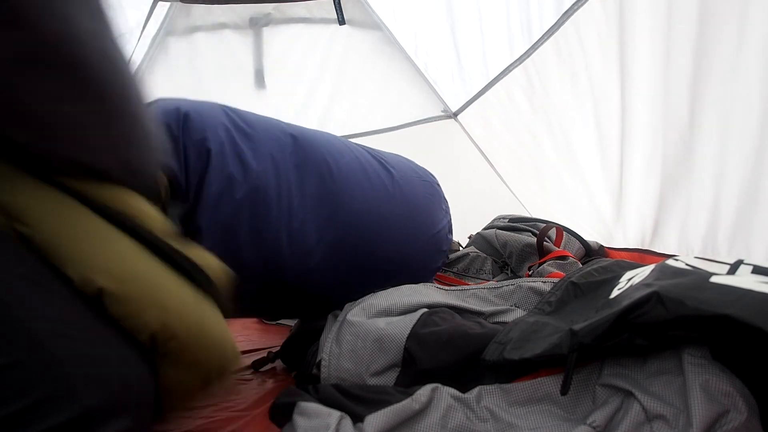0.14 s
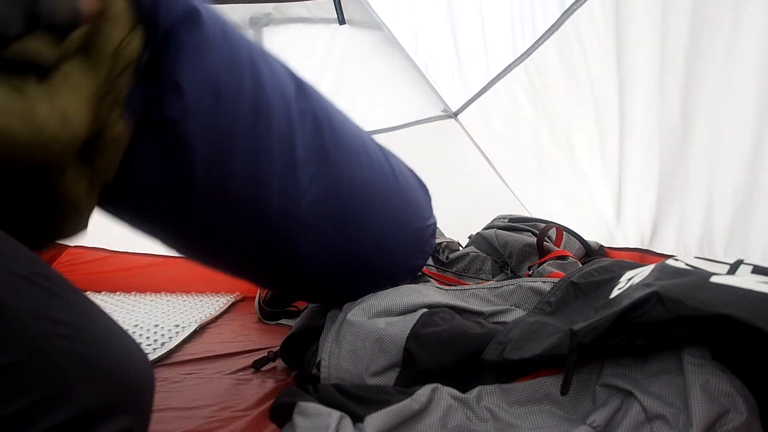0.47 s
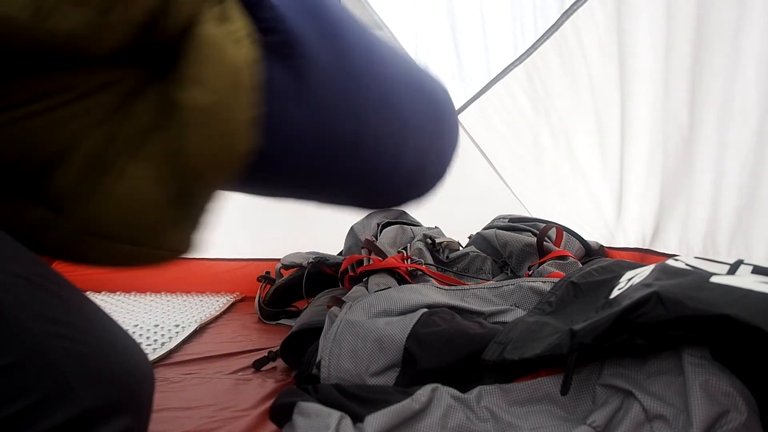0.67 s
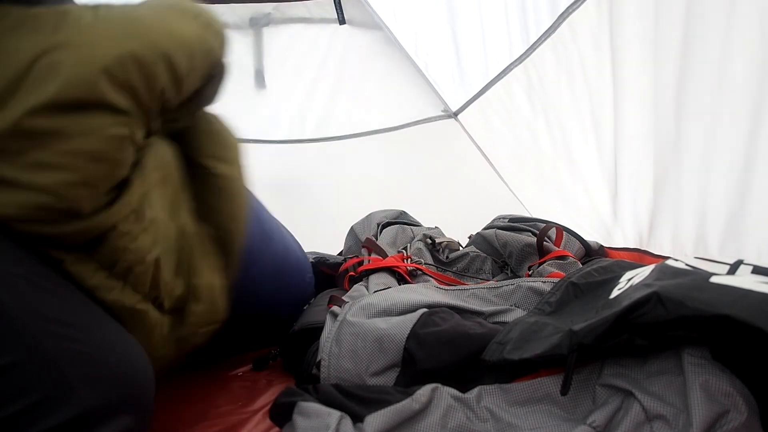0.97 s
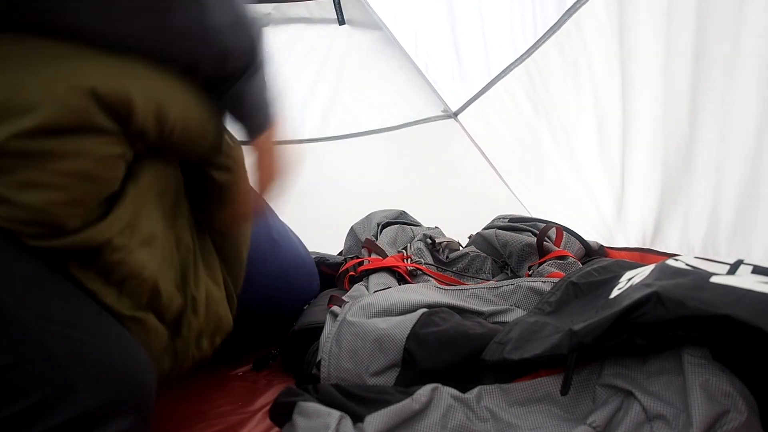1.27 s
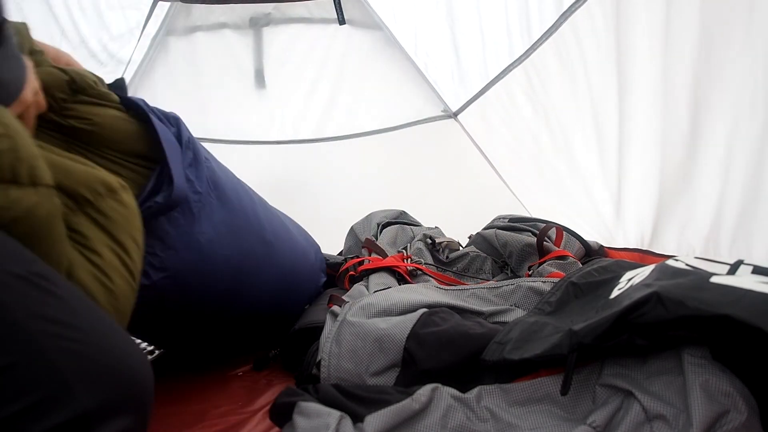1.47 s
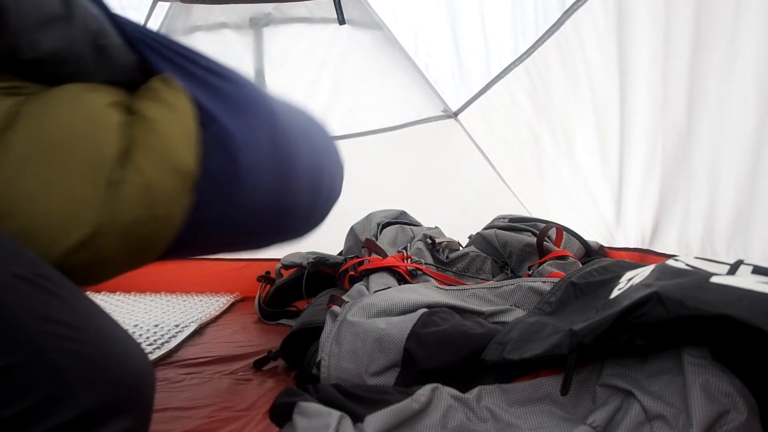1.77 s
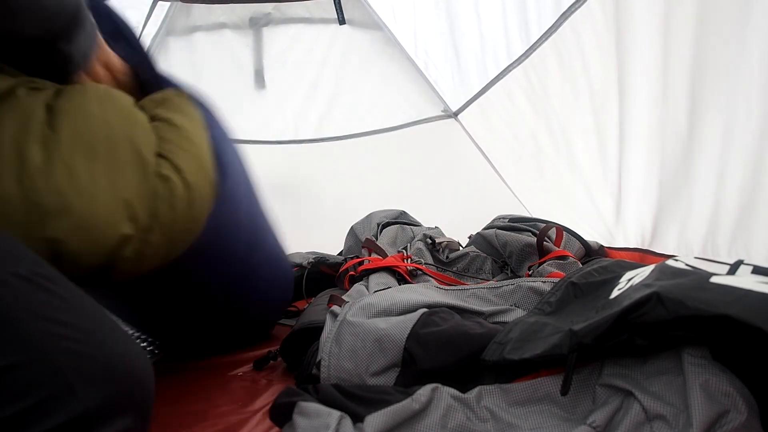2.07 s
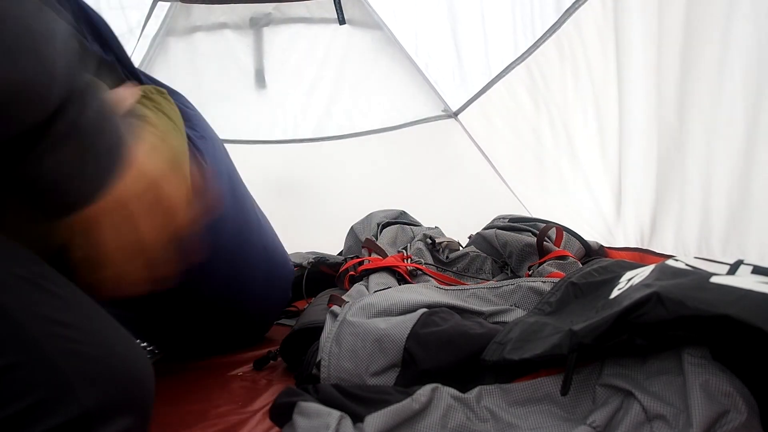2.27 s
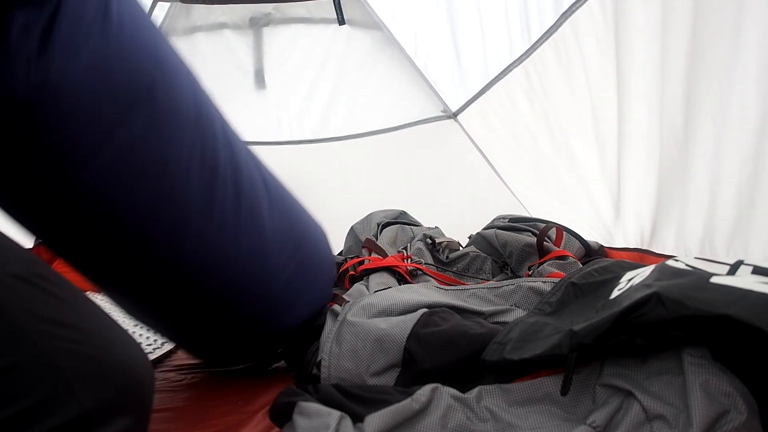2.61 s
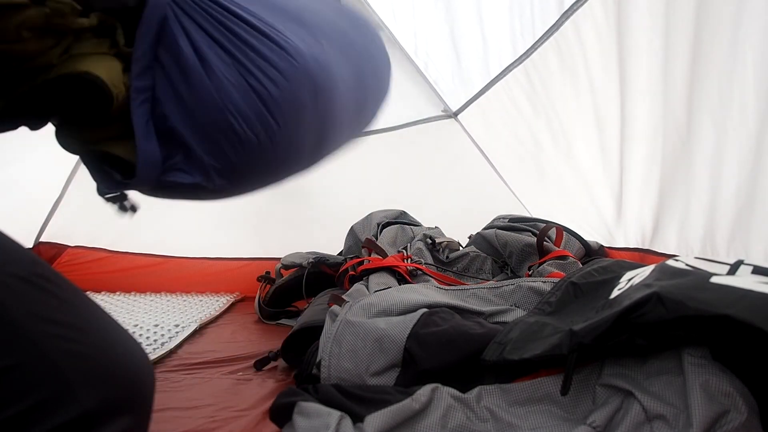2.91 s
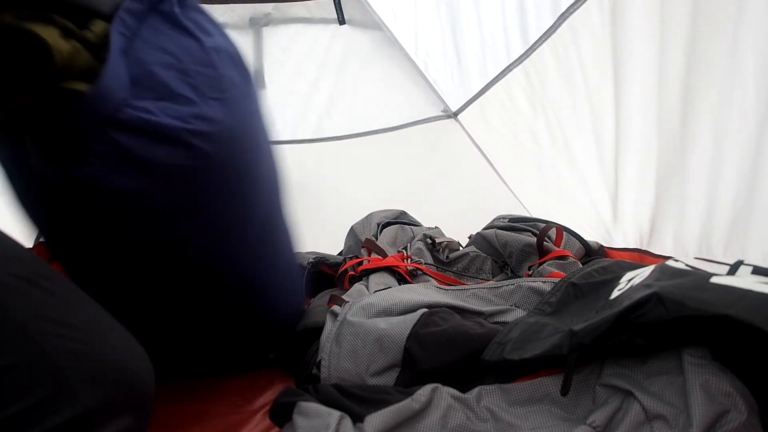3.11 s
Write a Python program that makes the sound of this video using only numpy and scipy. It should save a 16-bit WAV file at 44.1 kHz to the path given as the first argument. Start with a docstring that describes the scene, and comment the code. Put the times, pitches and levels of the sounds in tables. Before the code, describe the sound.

Nylon sleeping bag stuffed into its sack in three hissing shoves, with crinkles, snaps and soft pats.

```python
"""A down sleeping bag is pushed into its nylon stuff sack, close up in a small tent, in mono over faint air.
The first shove is hissing, rustling grains of cloth over muffled padding; gliding noise bands zip along the weave
and decaying sines snap as creases. A sleeve flicks, then the cloth is gathered, with soft sagging bumps and pats
made of slap and thump noise. A second shove, a pause, a third shove and a settle follow,
still with zips, snaps, bumps and pats; the last pats land just before the settle."""
import sys
import numpy as np
from scipy import signal
from scipy.fft import rfft, irfft, next_fast_len
from scipy.io import wavfile

SR = 44100
rng = np.random.default_rng(int(sys.argv[2]) if len(sys.argv) > 2 else 0)


def file_out(sig):
    """Save sig as 16-bit WAV at sys.argv[1]."""
    # one column per channel
    cols = np.atleast_2d(sig).T
    # limit, then scale
    lim = np.clip(cols, -1, 1)
    pcm = np.round(lim * 32767).astype(np.int16)
    wavfile.write(sys.argv[1], SR, pcm)


N = 143325
T = np.arange(N) / SR


def from_db(db):
    """Decibels to gain."""
    return 10 ** (np.asarray(db) / 20)


def rms_one(x):
    """Scale to unit power."""
    return x / np.sqrt(np.mean(x ** 2) + 1e-20)


def drift(rate_hz):
    """Random wander of unit power: noise through two equal one-pole lowpasses at the given rate."""
    pole = np.exp(-2 * np.pi * rate_hz / SR)
    noise = rng.standard_normal(N + SR)
    wander = signal.lfilter([1], [1, -2 * pole, pole * pole], noise)
    return rms_one(wander[SR:])  # drop the first second, while the filter settles


def coloured(x, spectrum):
    """Minimum-phase filter through the given (f/Hz, level/dB) points; unit power."""
    size = 2 * next_fast_len(N)
    hz, db = np.transpose(spectrum)
    bins = np.maximum(np.arange(size // 2 + 1) * SR / size, 1)
    gain = from_db(np.interp(np.log(bins), np.log(hz), db))
    # folding the cepstrum makes the filter causal
    cepstrum = irfft(np.log(gain))
    cepstrum[1:size // 2] *= 2
    cepstrum[size // 2 + 1:] = 0
    response = np.exp(rfft(cepstrum))
    return rms_one(irfft(rfft(x, size) * response)[:N])


GRAIN_TOP = 3.5  # cap on grain size, in spreads


def grains(per_s, spread_db):
    """Tiny random slips of uneven size and either sign."""
    sizes = from_db(spread_db * np.minimum(rng.exponential(1, N), GRAIN_TOP))
    signs = rng.choice([-1, 1], N)
    return sizes * signs * (rng.random(N) < per_s / SR)


FLICKER_PER_S = 26  # corner rate of the wander, Hz


def flickering(x, depth_db):
    """Each band swells and fades as folds open and close, partly in step with the others."""
    bins = np.maximum(np.arange(N // 2 + 1) * SR / N, 1)
    whole = rfft(x)
    centres = np.log(np.geomspace(150, 13000, 12))
    together, out = drift(FLICKER_PER_S), 0
    for share in np.eye(len(centres)):
        band = irfft(whole * np.interp(np.log(bins), centres, share), N)
        swell = .5 * together + drift(FLICKER_PER_S)
        out = out + band * from_db(depth_db * swell)
    return rms_one(out)


def burst(s, rise, fall, hold=0):
    """Exponential rise, a hold at the top, then exponential fall; all in seconds."""
    before = (s - T) / rise
    after = (T - s - hold) / fall
    return np.exp(-np.maximum(np.maximum(before, after), 0))


# outdoor air, relative colour: (f/Hz, level/dB)
AIR = [(20, -20), (60, -3.5), (200, -4), (400, -8), (1500, -7), (16000, -25)]
AIR_DB = -60.5


def outdoor_air():
    """Faint steady outdoor air: coloured noise."""
    return from_db(AIR_DB) * coloured(rng.standard_normal(N), AIR)


# sliding cloth by stretch: (t/s, hiss level/dB, rustle level/dB), before the layer trims below
FIRST_SHOVE = [(0, -42.5, -48), (0.04, -44.5, -42.5), (0.13, -38.5, -38), (0.195, -32, -39),
               (0.29, -37, -43.5), (0.36, -36.5, -39.5), (0.43, -32, -39), (0.508, -32, -34.5),
               (0.52, -28, -37), (0.595, -28, -33.5), (0.668, -29, -37.5), (0.735, -48, -46.5)]
GATHER = [(0.79, -40.5, -44.5), (0.82, -42, -38), (0.85, -35.5, -41.5), (0.915, -39, -39),
          (0.948, -37, -40.5), (1.0, -42, -48), (1.055, -45.5, -46), (1.12, -40.5, -50.5),
          (1.245, -44.5, -44.5)]
SECOND_SHOVE = [(1.29, -38.5, -40.5), (1.355, -35, -38), (1.455, -41, -43.5), (1.58, -36.5, -39),
                (1.66, -26.5, -35), (1.72, -28.5, -37), (1.8, -43, -44), (1.86, -46.5, -48),
                (1.935, -38, -44), (1.972, -33, -46), (1.987, -39, -47), (2.02, -40.5, -44)]
PAUSE = [(2.07, -41.5, -42.5), (2.125, -47.5, -50.5), (2.247, -50, -45.5)]
THIRD_SHOVE = [(2.27, -41.5, -41.5), (2.305, -33.5, -45.5), (2.335, -37, -42.5), (2.42, -35.5, -38.5),
               (2.5, -32.5, -39), (2.58, -35.5, -38), (2.65, -32.5, -36.5), (2.7, -27.5, -34),
               (2.81, -29.5, -34.5), (2.85, -33, -36.5), (2.885, -41, -45.5), (2.93, -47, -46.5),
               (3.0, -39, -47), (3.025, -39.5, -42)]
SETTLE = [(3.125, -35.5, -44), (3.175, -45, -44.5), (3.205, -45, -41), (3.25, -39.5, -47)]
# relative colour of the fine hiss and the duller folds: (f/Hz, level/dB)
HISS = [(300, -24.5), (1000, -8.5), (2000, -4.5), (3200, -2), (4900, -1), (5700, 0), (6250, -4.5),
        (8000, -4.5), (9500, -8), (11000, -13.5), (13500, -18), (16000, -29.5)]
RUSTLE = [(30, -37), (200, -15), (480, -12.5), (750, -2), (1080, -1.5), (1600, -4), (2300, -8.5),
          (4000, -16), (9000, -31), (16000, -19)]
HISS_TRIM_DB, HISS_GRAINS_PER_S, HISS_SPREAD_DB, HISS_FLICKER_DB = 0.62, 10000, 1.8, 0.82
RUSTLE_TRIM_DB, RUSTLE_GRAINS_PER_S, RUSTLE_SPREAD_DB, RUSTLE_FLICKER_DB = -0.12, 1800, 1.5, 0.7
# a quick flick of the sleeve
FLICK_AT_S, FLICK_RISE_S, FLICK_FALL_S, FLICK_DB = 0.760, 0.0096, 0.029, -32.5
# faster sliding is louder and brighter: the treble gains this many dB per dB of hiss above the medium level
BRIGHTEN_ABOVE_HZ, BRIGHTEN_DB_PER_DB, MEDIUM_HISS_DB = 6500, 0.0538, -36
CRINKLE_TRIM_DB = -3.5


def sliding():
    """Threads catch and slip in a hiss that brightens with speed; larger folds rustle and crinkle below it."""
    stretches = [FIRST_SHOVE, GATHER, SECOND_SHOVE, PAUSE, THIRD_SHOVE, SETTLE]
    s, hiss_db, rustle_db = np.vstack(stretches).T
    slide_level = from_db(HISS_TRIM_DB + np.interp(T, s, hiss_db))
    flick_level = from_db(FLICK_DB) * burst(FLICK_AT_S, FLICK_RISE_S, FLICK_FALL_S)
    hiss_level = np.hypot(slide_level, flick_level)

    hiss = coloured(grains(HISS_GRAINS_PER_S, HISS_SPREAD_DB), HISS)
    hiss = flickering(hiss, HISS_FLICKER_DB)
    treble_filter = signal.butter(1, BRIGHTEN_ABOVE_HZ, "high", fs=SR, output="sos")
    treble = signal.sosfilt(treble_filter, hiss)
    treble_gain = (hiss_level / from_db(MEDIUM_HISS_DB)) ** BRIGHTEN_DB_PER_DB
    hiss = hiss + treble * (treble_gain - 1)

    rustle = coloured(grains(RUSTLE_GRAINS_PER_S, RUSTLE_SPREAD_DB), RUSTLE)
    rustle = flickering(rustle, RUSTLE_FLICKER_DB)
    effort = from_db(np.interp(T, s, rustle_db))
    folds = from_db(RUSTLE_TRIM_DB) * effort * rustle
    return hiss * hiss_level + folds + from_db(CRINKLE_TRIM_DB) * crinkle(effort)


CRINKLE_LOW_HZ, CRINKLE_HIGH_HZ, CRINKLE_Q = 935, 2800, 3
CRINKLES_PER_S, CRINKLE_SPREAD_DB = 300, 2.5  # mean rate over all panels


def crinkle(effort):
    """Panels of different sizes buckle at random and ring briefly: sparse at rest, dense under effort."""
    pitches, out = np.geomspace(CRINKLE_LOW_HZ, CRINKLE_HIGH_HZ, 14), 0
    per_s = CRINKLES_PER_S / len(pitches) * effort / effort.mean()
    for hz in pitches:
        b, a = signal.iirpeak(hz, CRINKLE_Q, fs=SR)
        buckles = grains(per_s, CRINKLE_SPREAD_DB) + 1e-18  # offset keeps the filter off denormals
        out = out + signal.lfilter(b, a, buckles) / hz
    return rms_one(out) * np.sqrt(effort * effort.mean())


# muffled shifting of the padding, in the bass: (t/s, level/dB)
PADDING_LEVEL = [(0, -52), (0.5, -49.5), (0.75, -56), (0.9, -53), (1.1, -62), (1.65, -50.5), (1.85, -63),
                 (2.02, -54.5), (2.18, -61), (2.5, -49), (2.9, -63), (3.25, -53)]
# its relative colour: (f/Hz, level/dB)
PADDING = [(30, -18), (70, -13), (220, 0), (500, -2.5), (1500, -35)]
PADDING_GRAINS_PER_S, PADDING_SPREAD_DB = 600, 4


def padding():
    """The filling shifts in soft, muffled lumps: sparse grains, darkly filtered."""
    level = from_db(np.interp(T, *np.transpose(PADDING_LEVEL)))
    return level * coloured(grains(PADDING_GRAINS_PER_S, PADDING_SPREAD_DB), PADDING)


# zips of the weave, pitch following the sliding speed: (middle t/s, length/s, level/dB, first f/Hz, last f/Hz)
ZIPS = [(0.136, 0.087, -40, 1400, 2550), (0.214, 0.093, -34.5, 4190, 4910), (0.603, 0.066, -35, 3490, 4580),
        (0.767, 0.0376, -39, 5840, 4170), (0.779, 0.037, -38.5, 2000, 1757),
        (0.867, 0.063, -35, 7120, 8260), (1.135, 0.071, -47, 6740, 6700), (1.746, 0.0916, -39, 5310, 6020),
        (2.038, 0.016, -38.5, 3600, 3630), (2.307, 0.04, -39, 7500, 7900), (3.063, 0.04, -33, 7670, 8100),
        (3.082, 0.024, -28, 4170, 3910)]
ZIP_WIDTH = 0.2  # noise corner as a share of the middle pitch


def zips():
    """Ribs of the weave pass over each other at a gliding, uneven rate."""
    out = np.zeros(N)
    for s, length, db, first_hz, last_hz in ZIPS:
        progress = np.clip((T - s) / length + .5, 0, 1)
        pitch = first_hz * (last_hz / first_hz) ** progress
        phase = 2 * np.pi * np.cumsum(pitch) / SR
        width = ZIP_WIDTH * np.sqrt(first_hz * last_hz)
        tone = rms_one(drift(width) * np.cos(phase) + drift(width) * np.sin(phase))
        swell = np.abs(np.sin(np.pi * progress)) ** .5
        out += from_db(db) * swell * tone
    return out


# creases that snap over: (t/s, level/dB before trim and low cut, f/Hz)
SNAPS = [(0.557, -12.5, 2500), (0.577, -10.5, 1010), (0.597, -9, 3200), (0.880, -19, 1790),
         (1.2497, -24, 1160), (1.2808, -18, 1420), (1.713, -19, 910), (1.857, -25, 1050),
         (2.0375, -24, 1230), (2.2798, -16.5, 2040), (2.389, -20, 1130), (2.435, -22, 2700),
         (2.610, -15.5, 1190), (2.7101, -14.5, 1120), (2.721, -15.5, 2430), (2.771, -16, 1050),
         (3.123, -20.5, 870)]
SNAP_CYCLES, SNAP_TRIM_DB, SNAP_LOW_CUT_HZ = 1.53, -1.5, 960  # cycles to fall to 1/e


def snaps():
    """A crease flips with a sharp edge and dies away over a few cycles."""
    out = np.zeros(N)
    for s, db, hz in SNAPS:
        cycles = np.maximum(T - s, 0) * hz
        decay = (T >= s) * np.exp(-cycles / SNAP_CYCLES)
        # starting an eighth of a cycle in gives the sharp edge
        out += from_db(db + SNAP_TRIM_DB) * decay * np.sin(2 * np.pi * cycles + np.pi / 4)
    low_cut = signal.butter(1, SNAP_LOW_CUT_HZ, "high", fs=SR, output="sos")
    return signal.sosfilt(low_cut, out)


# returns from the ground and the tent walls: (delay t/s, level/dB)
ECHOES = [(0.0019, -22), (0.0078, -11), (0.0134, -14)]


def tent(x):
    """A few weak, early returns added to the direct sound."""
    returns = sum(from_db(db) * np.interp(T - delay, T, x, left=0) for delay, db in ECHOES)
    return x + returns


# soft bumps of the sack and knees: (t/s, level/dB before trim, starting f/Hz)
BUMPS = [(0.827, -35.5, 258), (0.869, -28, 297), (0.881, -27.5, 390), (1.038, -39.5, 223),
         (1.250, -32, 325), (1.28, -32.5, 255), (1.322, -31, 333), (1.328, -32, 328), (1.648, -35, 230),
         (2.032, -35.5, 126), (2.044, -35.5, 330), (2.252, -32.5, 340), (2.257, -42, 110),
         (2.521, -32, 300), (3.054, -27, 400), (3.067, -31, 363)]
BUMP_RISE_S, BUMP_TRIM_DB, BUMP_SAG = 0.0015, -1, 0.044  # sag per rise time


def bumps():
    """A cushioned knock: a brief low tone that sags in pitch."""
    out = np.zeros(N)
    for s, db, hz in BUMPS:
        age = np.maximum(T - s, 0) / BUMP_RISE_S
        shape = age * np.exp(1 - age)
        pitch = hz * (age > 0) / (1 + BUMP_SAG * age)
        out += from_db(db + BUMP_TRIM_DB) * shape * np.sin(2 * np.pi * np.cumsum(pitch) / SR)
    return out


# pats and grabs on the padding: (landing t/s, rise/s, hold/s, fall/s, slap level/dB, thump level/dB)
PATS = [(0.875, 0.011, 0.012, 0.018, -28, -38), (1.269, 0.006, 0.0059, 0.0057, -32.5, -45),
        (2.0345, 0.0033, 0.0066, 0.014, -30, -42.5), (2.253, 0.002, 0.0038, 0.0037, -28.5, -43),
        (3.035, 0.0049, 0.021, 0.0069, -31, -39.5), (3.067, 0.004, 0.016, 0.021, -26, -41.5)]
# relative colour of the crushed shell and the padding under it: (f/Hz, level/dB)
SLAP = [(30, -15), (150, -2.5), (450, -2), (720, 5.5), (1000, -3), (1300, 5), (3000, -2.5), (4300, -1),
        (6300, -4.5), (7900, -1), (9500, -6.5), (11000, -12), (16000, -21)]
THUMP = [(25, -24), (60, -15), (100, -0.5), (220, 4), (400, 2), (650, -16), (4000, -18)]
SLAP_GRAINS_PER_S, SLAP_SPREAD_DB = 7000, 0.5


def pats():
    """A hand lands, crushes the shell in a burst of slips and drives air out of the padding."""
    slap_level, thump_level = np.zeros(N), np.zeros(N)
    for s, rise, hold, fall, slap_db, thump_db in PATS:
        shape = burst(s, rise, fall, hold)
        slap_level += from_db(slap_db) * shape
        thump_level += from_db(thump_db) * shape
    slap = coloured(grains(SLAP_GRAINS_PER_S, SLAP_SPREAD_DB), SLAP)
    thump = coloured(rng.standard_normal(N), THUMP)
    return slap_level * slap + thump_level * thump


def scene():
    """Cloth and contacts over faint outdoor air, the same in both channels."""
    cloth = sliding() + padding() + zips()
    contacts = tent(snaps() + bumps()) + pats()
    mono = outdoor_air() + cloth + contacts
    return np.array([mono, mono])


CUTOFF_HZ = 15750


def record(dry):
    """The top is cut steeply by an elliptic lowpass."""
    top_cut = signal.ellip(12, .1, 80, CUTOFF_HZ, fs=SR, output="sos")
    return signal.sosfilt(top_cut, dry)


dry = scene()
out = record(dry)
file_out(out)
```